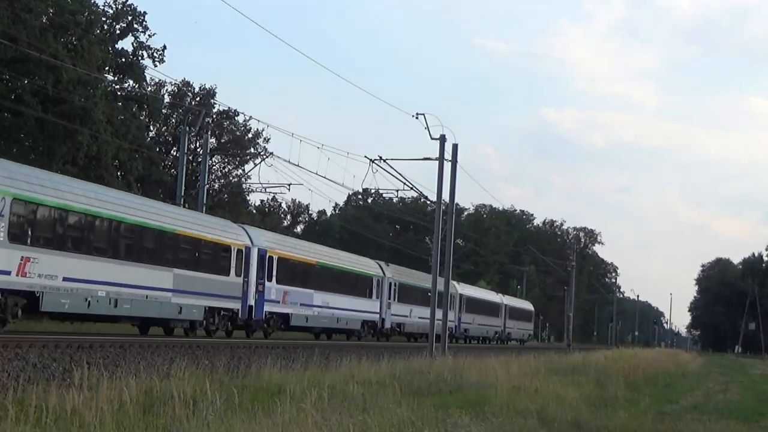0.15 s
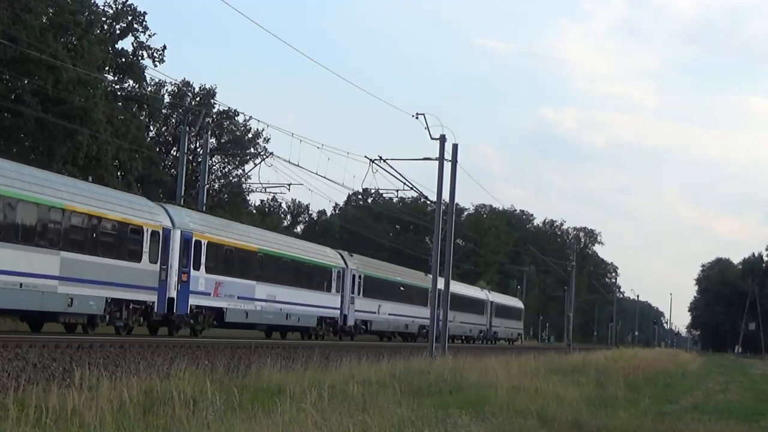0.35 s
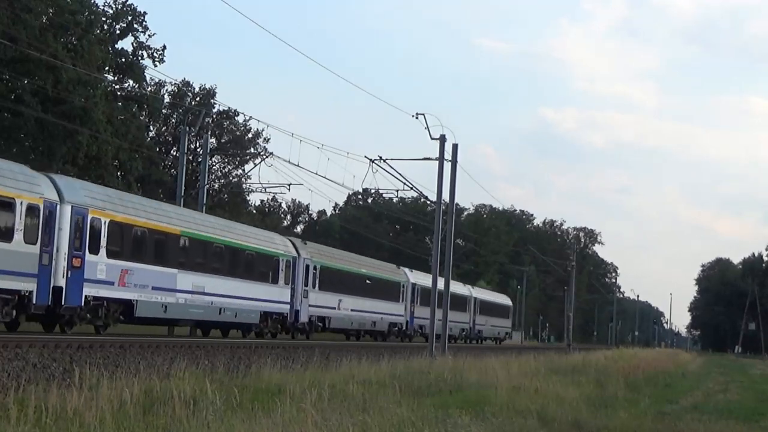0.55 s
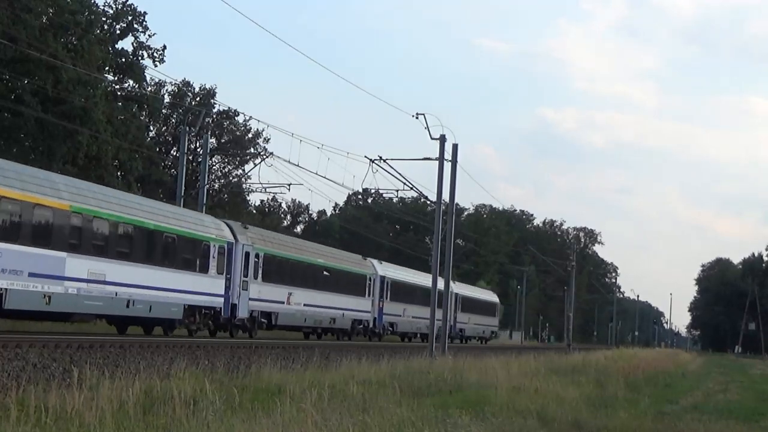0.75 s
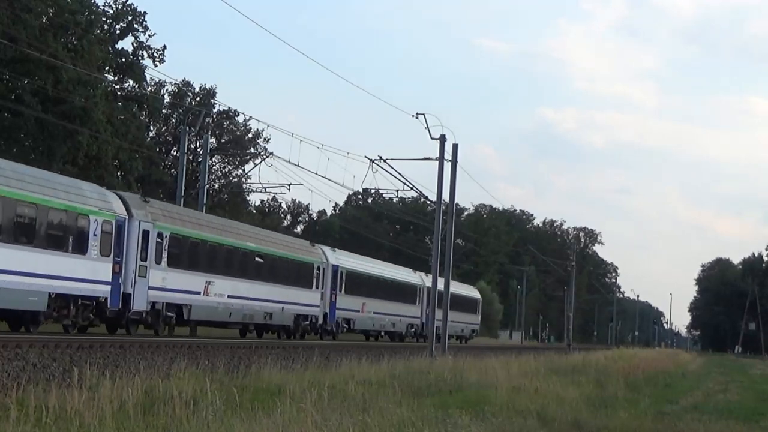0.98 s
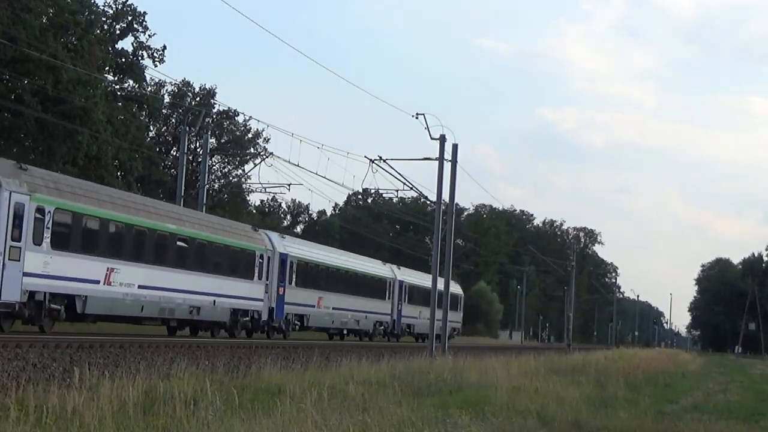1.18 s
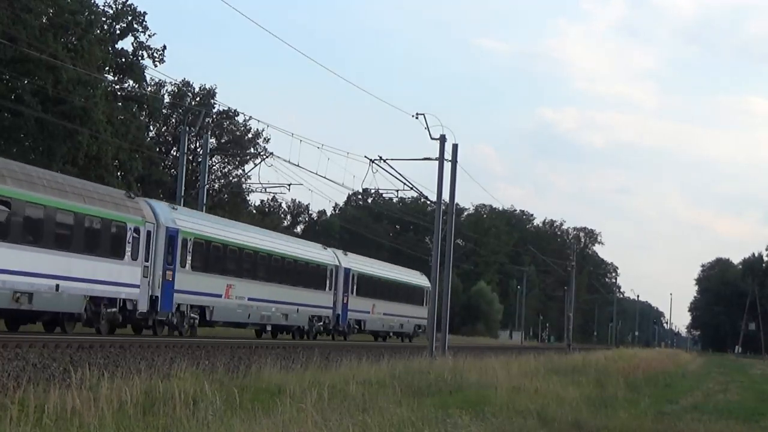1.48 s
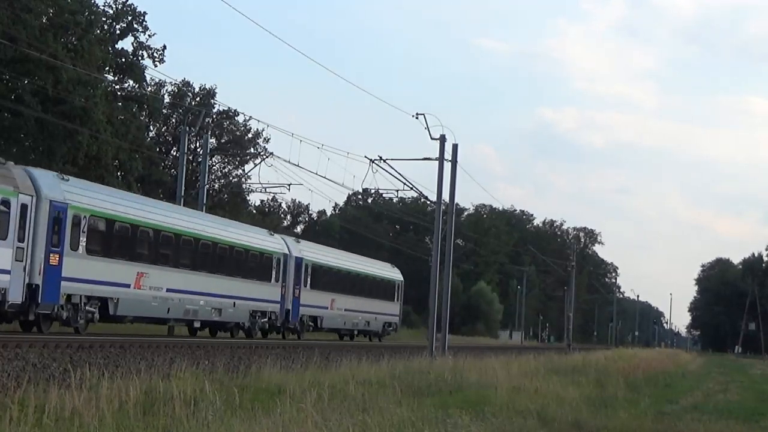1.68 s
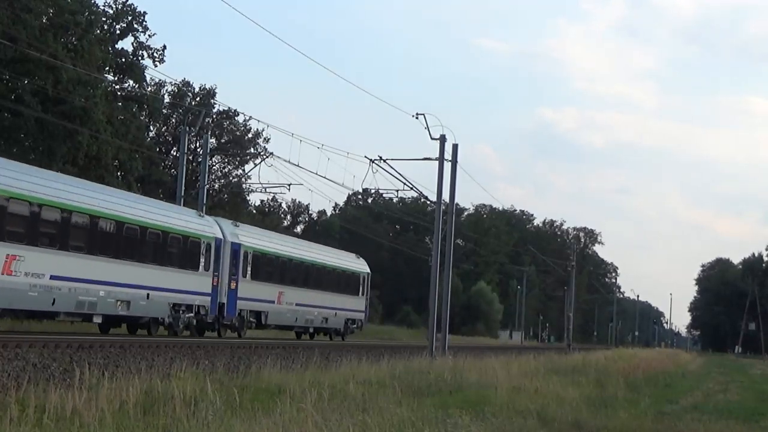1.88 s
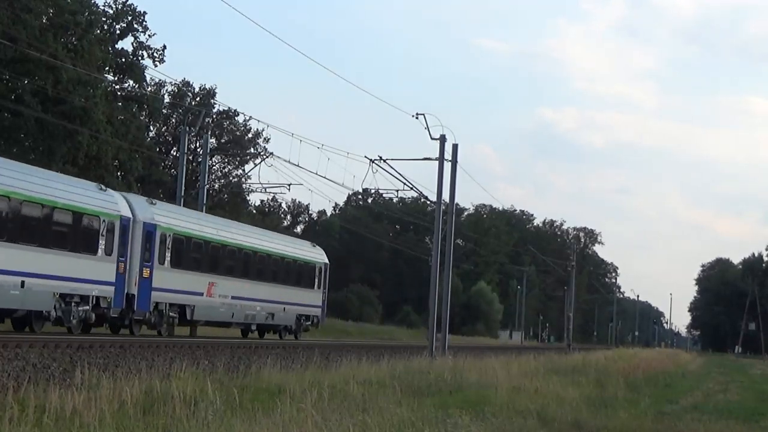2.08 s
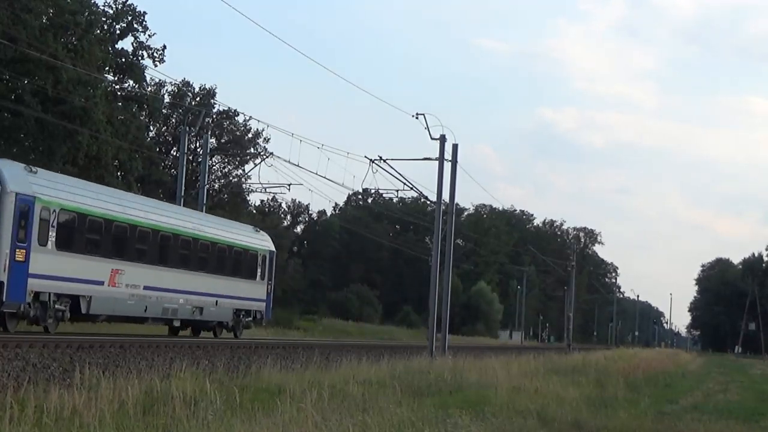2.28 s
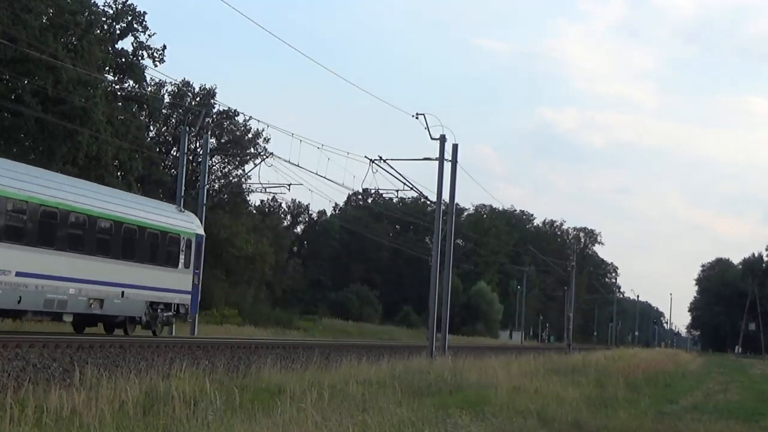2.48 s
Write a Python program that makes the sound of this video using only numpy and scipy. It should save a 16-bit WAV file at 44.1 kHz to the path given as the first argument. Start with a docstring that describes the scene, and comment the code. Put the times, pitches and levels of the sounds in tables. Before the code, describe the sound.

Train coaches roll quickly past a trackside microphone outdoors, slightly to the left. The rails roar throughout, while swells of hiss, a metallic ring from each passing set of wheels and a few brief steel scuffs come and go.

```python
"""Welded rails roar steadily over a rumble of sleepers as passenger coaches pass at speed.
Rail roughness excites the resonant modes of the wheels: each bogie rings as it goes by, amid
swells of hiss, and both fall in pitch by the Doppler effect. The wheel contacts add a fluttering
sizzle, a few brief scuffs of steel on steel and two high grazes. The train is louder on the left."""
import sys
import numpy as np
from scipy import signal
from scipy.fft import rfft, irfft, next_fast_len
from scipy.io import wavfile
from scipy.ndimage import uniform_filter1d

SR = 44100
rng = np.random.default_rng(int(sys.argv[2]) if len(sys.argv) > 2 else 0)


def unload_audio(sound):
    """Save the sound as a 16-bit wav file, at the path given as the first command line argument."""
    columns = np.transpose(np.atleast_2d(sound))
    # keep every value between -1 and 1, then stretch to whole-number steps
    steps = np.round(np.clip(columns, -1, 1) * 32767)
    wavfile.write(sys.argv[1], SR, steps.astype(np.int16))


N = 116865
T = np.arange(N) / SR
HZ = np.maximum(np.fft.rfftfreq(N, 1 / SR), 1)
SPEED_M_S, TRACK_M, SOUND_M_S = 40, 19, 343
FLUTTER_HZ, GRAIN_HZ = 69.8, 300  # rates of random level fluctuation

# Source spectra (f/Hz, relative level/dB)
RAIL_SPECTRUM = [(300, -31), (700, -15.5), (1000, -5), (1250, -4.5), (1500, -3.5), (1850, 0.5), (2200, 1),
                 (2700, -1.5), (3150, -1.5), (3600, -8), (5000, -15), (8000, -21.5), (15000, -40)]
SLEEPER_SPECTRUM = [(20, -6.5), (60, -8.5), (170, -8), (300, -6), (370, -4), (450, 3), (580, 1), (780, 5.5),
                    (1050, 1.5), (1500, -3), (3000, -18)]
SIZZLE_SPECTRUM = [(2500, -38), (4500, 0.5), (5800, -2), (7000, 0), (8200, -1), (9800, -1.5), (11000, -9.5),
                   (13000, -13), (15800, -27)]
HISS_SPECTRUM = [(1500, -37), (2600, -28.5), (3300, 5), (4200, 5.5), (5200, -0.5), (7000, -10.5),
                 (15000, -38)]
SCUFF_SPECTRUM = [(1500, -13), (4000, 4), (7500, 2), (10000, -12), (15800, -15)]
GRAZE_SPECTRUM = [(4000, -10), (7500, -1), (9000, 5), (10000, 1.5), (11500, -3), (13500, -9), (15800, -18)]
# Envelopes of the continuous sources (t/s, level/dB)
RAIL_ENVELOPE = [(0, -23.5), (.13, -27), (.22, -22.5), (.48, -20.5), (.6, -22.5), (.8, -20.5),
                 (1.02, -21.5), (1.19, -23), (1.4, -20.5), (1.75, -19.5), (2.05, -20.5), (2.3, -21.5),
                 (2.65, -21)]
SLEEPER_ENVELOPE = [(0, -37), (.12, -37), (.33, -39), (.48, -34.5), (.62, -37.5), (.8, -33), (1.16, -36),
                    (1.5, -34), (1.85, -35.5), (1.94, -33), (2.05, -35), (2.35, -31.5), (2.57, -32),
                    (2.65, -34.5)]
SIZZLE_ENVELOPE = [(0, -37), (.16, -34), (.33, -35.5), (.45, -32), (.75, -33.5), (1.1, -30), (1.5, -32),
                   (1.65, -32.5), (1.8, -32.5), (2.0, -35), (2.2, -33), (2.38, -31.5), (2.5, -37.5),
                   (2.65, -35.5)]
# Bogies (closest approach t/s, lower wheel mode f/Hz, level/dB, upper mode f/Hz, level/dB)
BOGIE_PASSES = [(0.121, 1710, -48, 2270, -27.5), (.38, 1647, -26, 2333, -24.5),
                (.61, 1546, -26.5, 2120, -29), (.85, 1690, -24.5, 2430, -29),
                (1.10, 1597, -27, 2257, -25.5), (1.469, 1570, -30, 2176, -24.5),
                (1.681, 1533, -26, 2126, -32), (2.0, 1640, -28, 2160, -23.5), (2.2, 1465, -26, 1980, -34),
                (2.36, 1320, -33.5, 2260, -28), (2.6, 1320, -35, 1920, -28.5)]
# The upper wheel mode and its weaker overtones (frequency ratio, relative level/dB)
UPPER_MODES = [(0.998, 3), (1.075, -8), (1.221, -5), (1.31, -7.5), (1.42, -13), (1.83, -8)]
# Swells of wheel hiss and of grazing contact (peak t/s, half-width/s, level/dB)
HISS_EVENTS = [(0.371, 0.086, -28.5), (.80, 0.075, -31), (1.013, 0.14, -26.5), (1.449, 0.19, -32),
               (1.952, 0.096, -28), (2.557, 0.13, -25)]
GRAZE_EVENTS = [(1.245, .075, -30), (1.38, 0.037, -34.5)]
# Slips of steel on steel (peak t/s, level/dB)
SCUFF_EVENTS = [(.44, -41), (.55, -29), (.705, -28.5), (.785, -32), (.855, -29), (1.025, -25.5),
                (1.54, -39), (1.79, -34)]
# Coherence of the left and right channels (f/Hz, coherence from 0 to 1)
COHERENCE = [(60, .57), (130, .65), (290, 0.87), (640, 0.99), (1300, 0.78), (2400, 0.97), (4500, 0.63),
             (8000, 0.68), (15000, 0.85)]
# Left minus right: by frequency (f/Hz, level/dB), in time (t/s, level/dB), in phase (f/Hz, phase/rad)
LEVEL_DIFFERENCE = [(60, 3), (110, 5), (200, 2.5), (380, 0.5), (700, 4.5), (1290, 6), (2400, 4.5),
                    (4400, 5), (6500, 3), (7700, 1), (8800, -2.5), (11000, -1.5), (15000, 1)]
LEVEL_DRIFT = [(0, 0), (.45, 1), (1.4, 1), (1.85, 1.2), (2.2, 2.5), (2.65, 1.2)]
PHASE_DIFFERENCE = [(0, 0.3), (1210, 0.0021), (1460, -0.95), (1720, -0.83), (3270, -0.4), (5770, -0.65),
                    (6720, -1.14), (7320, -0.9), (7840, -1.36), (9040, 0.096), (15300, -0.1)]


def undb(db):
    """Amplitude grows tenfold for every 20 dB."""
    return 10 ** (np.asarray(db) / 20)


def over_time(rows):
    """Linear interpolation in time."""
    return np.interp(T, *np.array(rows).T)


def over_frequency(rows):
    """Linear interpolation in log frequency."""
    hz, value = np.array(rows, float).T
    return np.interp(np.log(HZ), np.log(np.maximum(hz, 1)), value)


def noise(gain):
    """Two incoherent noises of one spectrum, rms 1: the direct and the scattered field."""
    size = next_fast_len(N, real=True)
    white = rfft(rng.standard_normal((2, size)))
    shaped = irfft(white * np.interp(np.fft.rfftfreq(size, 1 / SR), HZ, gain), size)[:, :N]
    return shaped / shaped.std()


def steel_noise(spectrum, ripple_db, spacing_hz=70.2):
    """Modal overlap: the crowded high modes of steel ripple a noise spectrum irregularly."""
    knots = np.arange(0, SR / 2, spacing_hz)
    ripple = np.interp(HZ, knots, rng.standard_normal(len(knots)))
    return noise(undb(over_frequency(spectrum) + ripple_db * ripple))


def fluctuation(rate_hz):
    """A smooth random process of zero mean and unit variance."""
    knots = np.arange(0, T[-1] + 1, 1 / rate_hz)
    jagged = np.interp(T, knots, rng.standard_normal(len(knots)))
    smooth = uniform_filter1d(jagged, int(SR / rate_hz))
    return (smooth - smooth.mean()) / smooth.std()


def flutter(depth_db, rate_hz=FLUTTER_HZ):
    """Gain for random amplitude modulation."""
    return undb(depth_db * fluctuation(rate_hz))


def swell(at, half_width, db):
    """A Gaussian rise and fall of amplitude."""
    return undb(db) * np.exp(-((T - at) / half_width) ** 2 / 2)


def delay(sound, seconds):
    """A varying delay modulates phase; the sound wraps round at its ends."""
    return np.array([np.interp((T - seconds) % T[-1], T, field) for field in sound])


def distance(closest_at):
    """Range in metres of a wheel in uniform straight motion."""
    return np.hypot(SPEED_M_S * (T - closest_at), TRACK_M)


def doppler(sound, closest_at):
    """Doppler effect: the changing travel time lowers the pitch as a wheel goes by."""
    return delay(sound, (distance(closest_at) - TRACK_M) / SOUND_M_S)


def rail_roar():
    """Vibrating rails radiate broadband noise along their length."""
    envelope = undb(over_time(RAIL_ENVELOPE)) * flutter(depth_db=0.49)
    return steel_noise(RAIL_SPECTRUM, ripple_db=2.36) * envelope


def sleeper_rumble():
    """Forced vibration of sleepers and ballast radiates at lower frequencies."""
    envelope = undb(over_time(SLEEPER_ENVELOPE)) * flutter(depth_db=1.06)
    return noise(undb(over_frequency(SLEEPER_SPECTRUM))) * envelope


def contact_sizzle():
    """Rolling contact continuously excites the high modes of the steel."""
    return steel_noise(SIZZLE_SPECTRUM, ripple_db=1) * undb(over_time(SIZZLE_ENVELOPE))


def wheel_mode(hz, half_width_hz):
    """Power response of a resonance, 6 dB down at one half-width from its centre."""
    return 1 / (1 + ((HZ - hz) / half_width_hz) ** 2) ** 2


def wavering_ring(power, rate_hz=24.004, jitter_s=0.00015, depth_db=1.8):
    """Random excitation: patches of rail roughness make a resonance waver in phase and level."""
    ring = delay(noise(np.sqrt(power)), jitter_s * fluctuation(rate_hz))
    return ring * undb(depth_db * np.tanh(fluctuation(rate_hz)))


def wheel_ringing(beam_exponent=6.45):
    """Directivity: resonating wheels beam sideways, so each bogie is loudest at closest approach."""
    out = 0
    for at, lower_hz, lower_db, upper_hz, upper_db in BOGIE_PASSES:
        lower = wheel_mode(lower_hz, half_width_hz=102)
        upper = sum(undb(db) ** 2 * wheel_mode(ratio * upper_hz, half_width_hz=48)
                    for ratio, db in UPPER_MODES)
        ring = undb(lower_db) * wavering_ring(lower) + undb(upper_db) * wavering_ring(upper)
        out += doppler(ring, at) * (TRACK_M / distance(at)) ** beam_exponent
    return out


def wheel_hiss():
    """The high modes of passing wheels merge into swells of Doppler-shifted hiss."""
    return sum(doppler(steel_noise(HISS_SPECTRUM, ripple_db=1), at) * swell(at, half_width, db)
               for at, half_width, db in HISS_EVENTS)


def scuffs(attack_s=0.008, decay_s=0.048):
    """Sliding friction: steel slips on steel in bursts that rise and decay exponentially."""
    envelope = sum(undb(db) * np.exp(-np.maximum((at - T) / attack_s, (T - at) / decay_s))
                   for at, db in SCUFF_EVENTS)
    return noise(undb(over_frequency(SCUFF_SPECTRUM))) * envelope


def grazes():
    """Friction gives a high hiss as a wheel grazes the rail."""
    return steel_noise(GRAZE_SPECTRUM, ripple_db=1) * sum(swell(*event) for event in GRAZE_EVENTS)


def stereo(fields):
    """Partial coherence: the channels share the direct field and take the scattered in antiphase."""
    direct, scattered = rfft(fields)
    coherence = over_frequency(COHERENCE)
    sides = np.array([[1], [-1]])  # left, right
    channels = np.sqrt((1 + coherence) / 2) * direct + sides * np.sqrt((1 - coherence) / 2) * scattered
    balance = undb(sides * over_frequency(LEVEL_DIFFERENCE) / 2)
    phase = sides * np.interp(HZ, *np.array(PHASE_DIFFERENCE).T) / 2
    drift = undb(sides * over_time(LEVEL_DRIFT) / 2)
    return irfft(channels * balance * np.exp(1j * phase), N) * drift


def scene():
    """Superposition: track and wheel sounds add; sizzle, grazes and hiss flutter together."""
    track = rail_roar() + sleeper_rumble()
    grainy_treble = (contact_sizzle() + grazes()) * flutter(depth_db=0.8, rate_hz=GRAIN_HZ)
    contacts = (grainy_treble + wheel_hiss()) * flutter(depth_db=1.1)
    return stereo(track + contacts + wheel_ringing() + scuffs())


def record(dry):
    """Band limiting: a steep low-pass filter removes the treble above 15.8 kHz."""
    return signal.sosfilt(signal.ellip(10, 0.2, 80, 15800, fs=SR, output="sos"), dry)


dry = scene()
out = record(dry)
unload_audio(out)
```